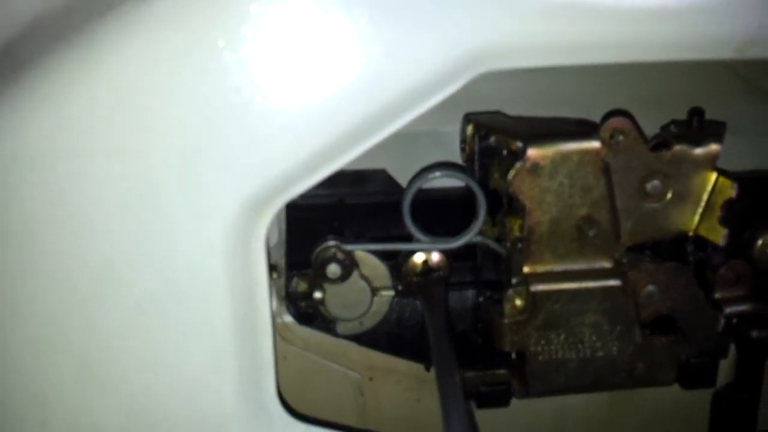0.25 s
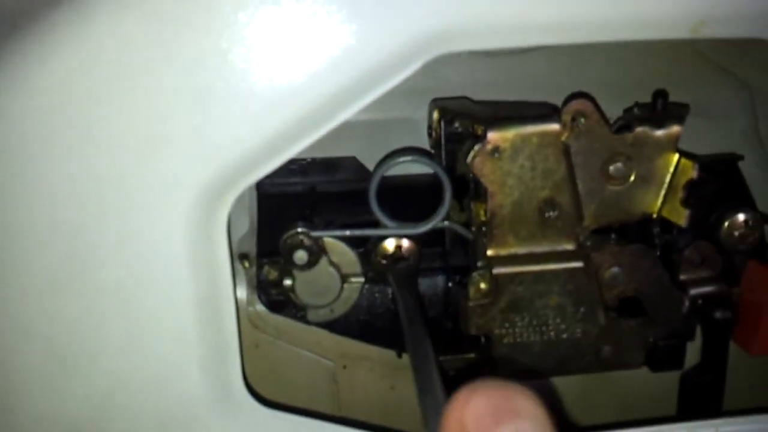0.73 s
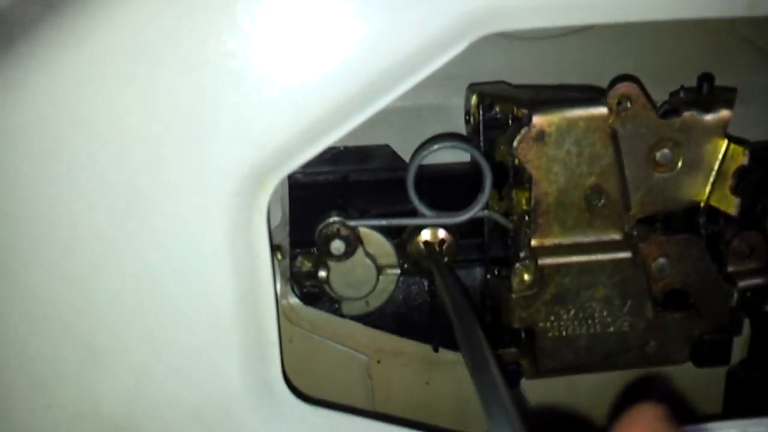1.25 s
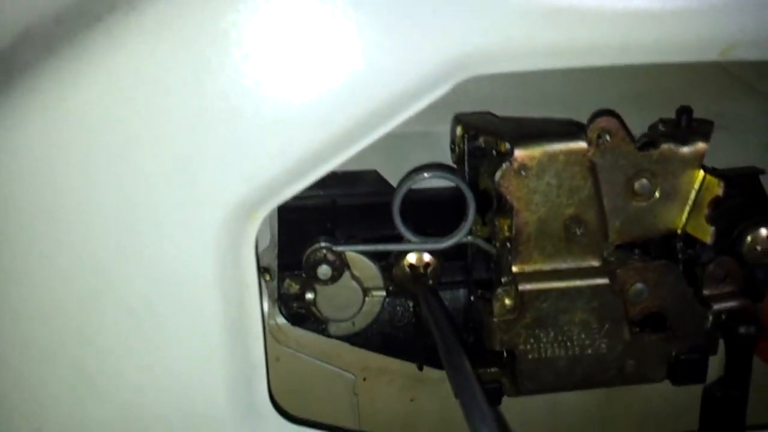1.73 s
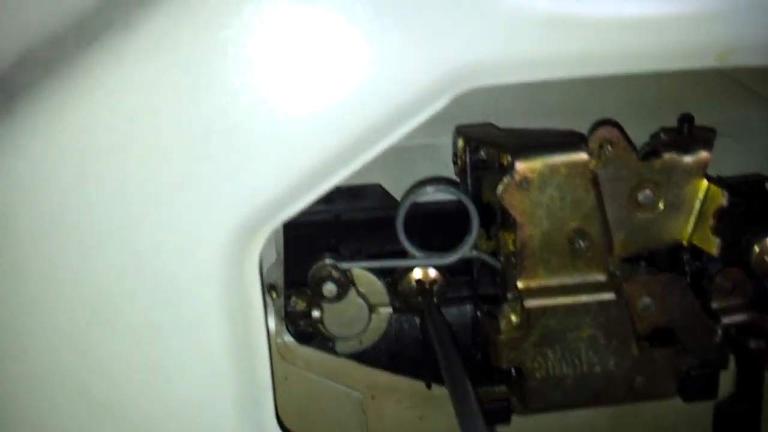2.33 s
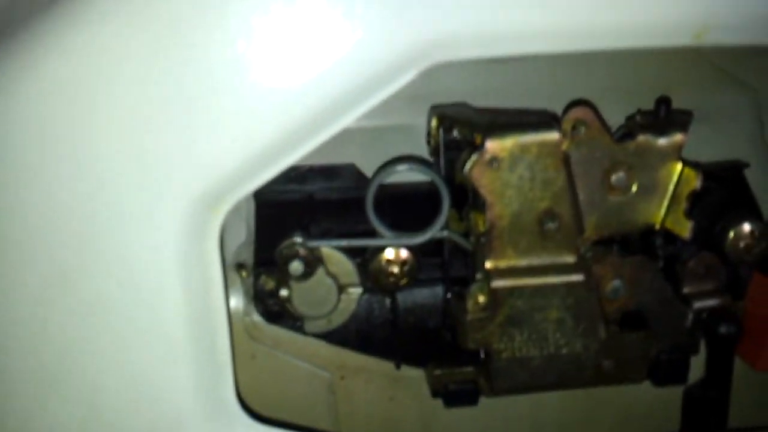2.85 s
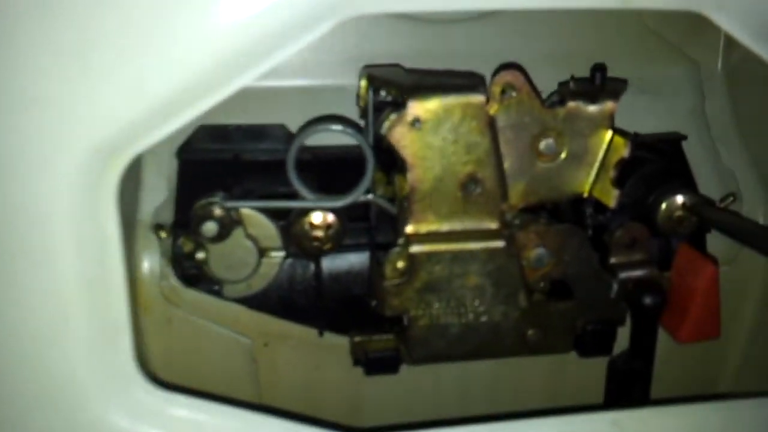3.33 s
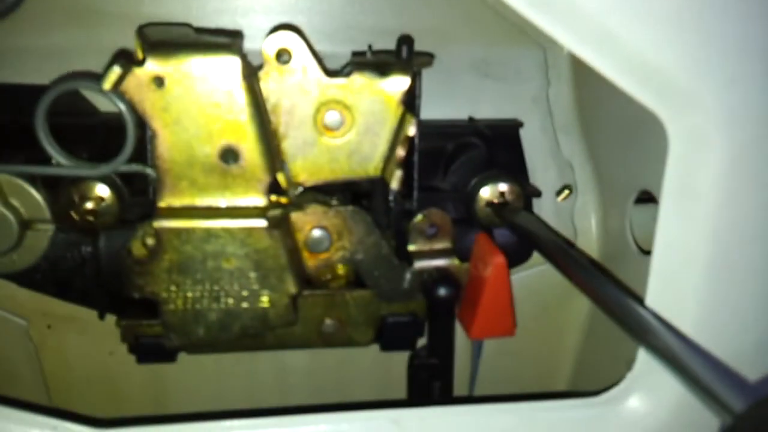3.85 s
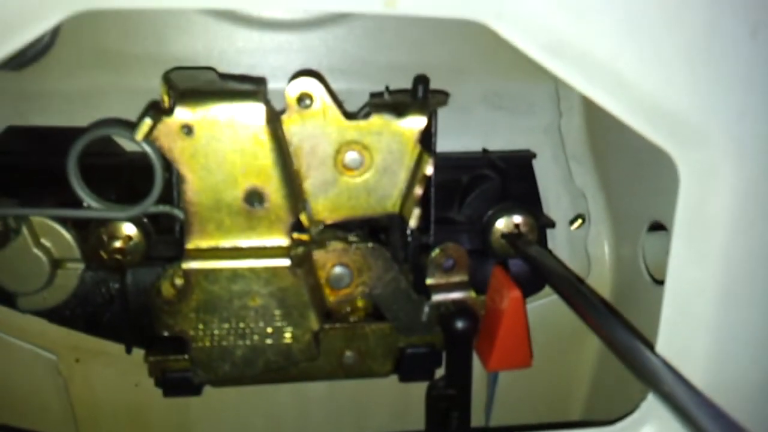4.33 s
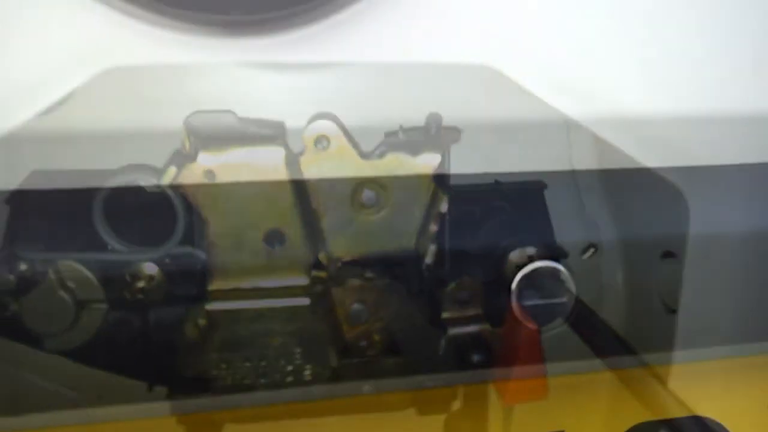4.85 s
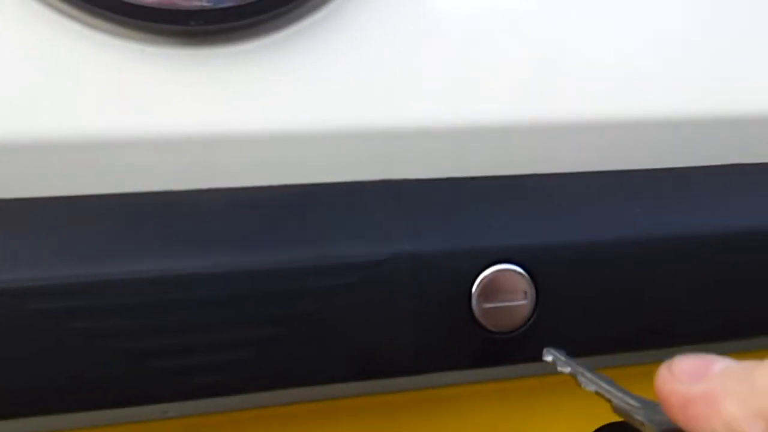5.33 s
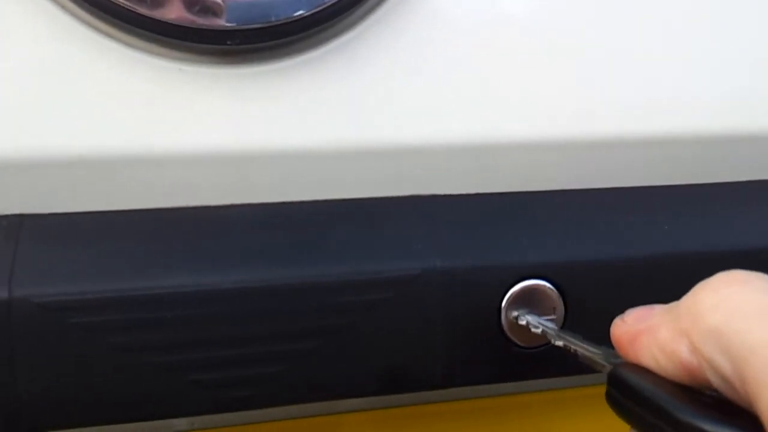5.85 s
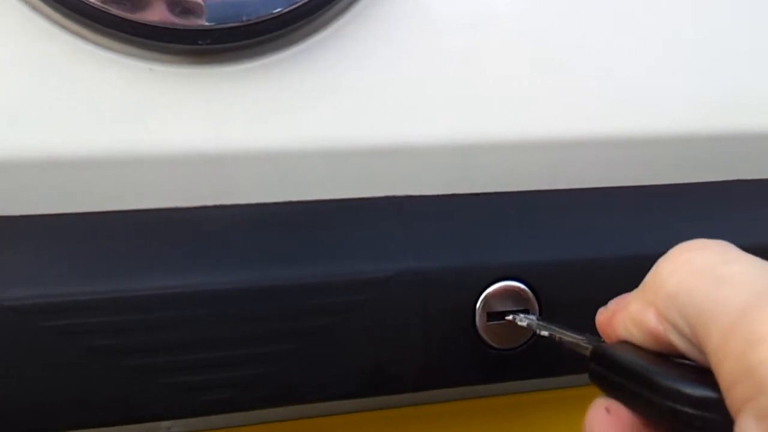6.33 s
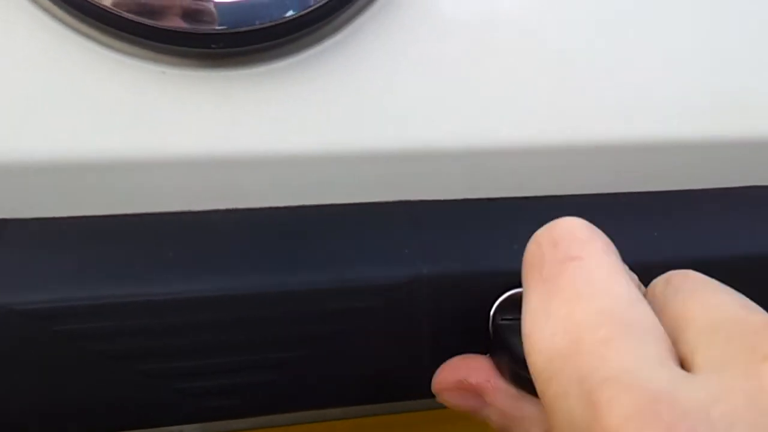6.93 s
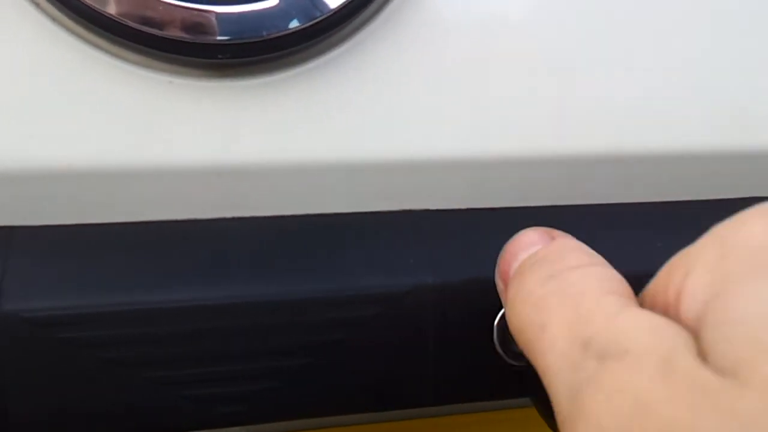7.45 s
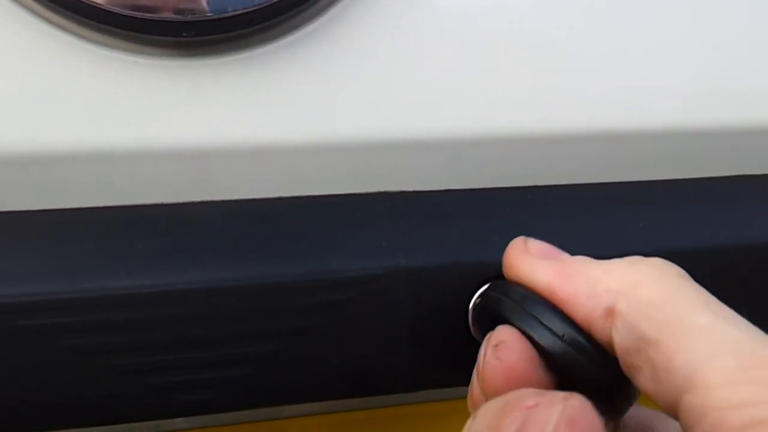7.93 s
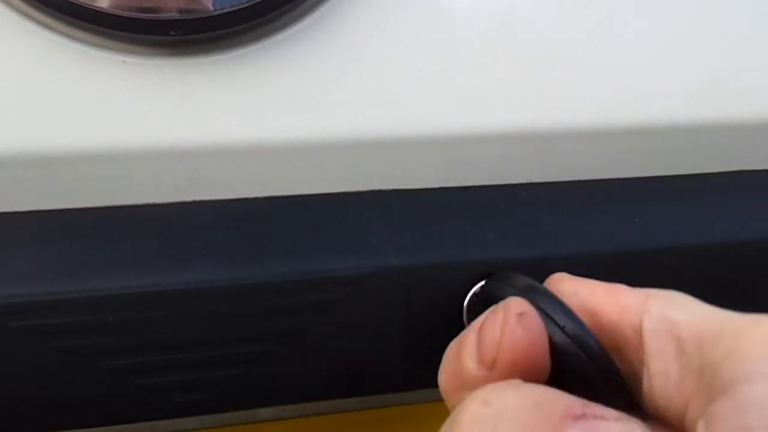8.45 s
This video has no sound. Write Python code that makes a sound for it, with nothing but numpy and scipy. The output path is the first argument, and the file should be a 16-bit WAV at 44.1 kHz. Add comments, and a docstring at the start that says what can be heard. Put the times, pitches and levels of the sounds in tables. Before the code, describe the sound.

A stereo microphone sits close to a hollow car door over a faint, low workshop drone. A screwdriver slips on latch screws, each slip giving a metallic clank and a short boom from the steel shell, clearest at about 0.3 and 1.9 seconds. A spring pings softly at 1.4, and the tip scrapes near 3. The loudest clank lands at 3.8, followed by a quick cluster around 4.3.

By about 5 seconds the drone has faded into quiet open air. A small bird gives thin, falling trills at 5.6 and, more faintly, 6.4. On the right, a key taps the lock from 6.2 and rasps in with a run of clicks around 7.1. It turns back and forth, clacking against its stops at 7.6 and 8, then more lightly until 8.6. The bird whistles faintly after 8, and light air puffs touch the microphone near 6.5 and 8.

```python
"""Workshop, stereo microphone close to a hollow car door, over a low drone. A screwdriver cracks loose
the latch screws: at every slip the bracket clanks and the steel shell booms; a spring pings once.
The drone gives way to open air and a small bird calls nearby. To the right, a key taps the lock,
rasps in over the wafers and is turned back and forth against its stops, while the bird calls again
and light air puffs on the microphone ports."""
import sys
import numpy as np
from scipy import signal
from scipy.fft import rfft, irfft, next_fast_len
from scipy.io import wavfile
from scipy.ndimage import map_coordinates

SR = 44100
rng = np.random.default_rng(int(sys.argv[2]) if len(sys.argv) > 2 else 0)


def generate_wav(signal):
    """Clip the signal to [-1, 1] and save it as 16-bit WAV at the path in sys.argv[1]."""
    frames = np.transpose(np.atleast_2d(signal))
    scaled = np.clip(frames, -1, 1) * 32767
    pcm = np.round(scaled).astype(np.int16)
    wavfile.write(sys.argv[1], SR, pcm)


N = 382788
TIME = np.arange(N) / SR
AGE = TIME[:SR // 2]  # time since a blow
PLAY_S = .0103  # time to cross the play between barrel and linkage

# door shell modes: (frequency [Hz], level struck at the left screw [dB], at the right screw [dB])
SHELL_MODES = [(143.5, -16.5, -20), (219.3, -11.5, -13), (251.2, -11.5, -10), (344.5, -21.5, -0.5),
               (404.6, 4, -0.5), (454.4, -7, -7.5), (532, -1, -3), (582, -6.5, -2.5), (641, 1.5, -1),
               (664, 1.5, -2), (725, -2, 2.5), (782, -9.5, -5.5), (863, -16, -2.5)]
# latch bracket modes: (frequency [Hz], level struck at the left screw [dB], at the right screw [dB])
BRACKET_MODES = [(908, -12, -9), (1031, 0, -4.5), (1148, -11, 0), (1196, -8.5, -5), (1245, 13, -11),
                 (1320, -17, -6.5), (1360, -5, -5), (1462, -14, 2.5), (1575, 2, -13), (1810, -0.5, -18),
                 (1960, -13, -21), (2017, 1, -6), (2340, -38, 1), (2606, -9, -4.5), (2770, -7, -5)]
# spectrum of the thin hiss and of the bird's echoes: (frequency [Hz], level [dB])
HISS_SPECTRUM = [(500, -23), (1800, 0), (3000, 2), (5500, -2.5), (8000, -1), (11000, -2), (15000, -4.5)]
# the barrel meets a stop twice over:
# (time [s], barrel clack [dB], door knock [dB], key click [dB], second hit over first [dB])
BARREL_STOPS = [(7.5655, -33, -42.5, -33, 6.5), (8.007, -40.5, -42, -31, -4.5), (8.215, -54, -67, -46.5, 1),
                (8.519, -50.5, -60.5, -34.5, -3), (8.638, -49.5, -50, -45, -1)]


def amp(db):
    """Decibels to gain."""
    return 10 ** (np.asarray(db) / 20)


def unit(x):
    """Scale to rms 1."""
    return x / np.sqrt(np.mean(x ** 2) + 1e-20)


def along(points, hz):
    """Read (frequency [Hz], value) points on a log axis."""
    f, v = np.transpose(points)
    return np.interp(np.log(hz + 1), np.log(f), v)


def pan(right_db):
    """Channel gains with the right right_db above the left."""
    return unit(amp([[-right_db / 2], [right_db / 2]]))


def add(track, s, sound):
    """Mix a stereo sound in at s seconds."""
    start = max(round(s * SR), 0)
    part = track[:, start:start + sound.shape[1]]
    part += sound[:, :part.shape[1]]


def wander(rate):
    """A smooth random curve with rate knots a second."""
    return map_coordinates(rng.standard_normal(int(N * rate / SR) + 4), [TIME * rate])


def noise(spectrum, size):
    """Coloured stereo noise of rms 1, most alike at the two ports in the upper bass."""
    # likeness of left and right: (frequency [Hz], correlation [ratio])
    likeness = [(40, 0.069), (150, 0.71), (450, 0.53), (900, 0.25), (2000, 0.0057)]
    m = next_fast_len(size)
    hz = np.fft.rfftfreq(m, 1 / SR)
    width = np.arccos(np.clip(along(likeness, hz), -1, 1)) / 2
    coloured = rfft(rng.standard_normal((2, m))) * amp(along(spectrum, hz))
    mid, side = irfft(coloured * [np.cos(width), np.sin(width)], m)[:, :size]
    return unit(np.array([mid + side, mid - side]))


def burst(spectrum, t60, attack):
    """Countless close resonances struck at once and dying together."""
    shape = amp(-60 * AGE / t60) * (1 - np.exp(-AGE / attack))
    return unit(noise(spectrum, len(AGE)) * shape) * np.sqrt(np.mean(shape ** 2))


def ring(modes, attack, scatter_db, spread, detune):
    """Modes struck at new strengths; spread is the phase scatter between the ports in radians."""
    hz, db, t60 = np.transpose(modes)[:, :, None]
    gain = amp(db + scatter_db * rng.standard_normal((2, len(hz), 1)))
    phase = rng.uniform(0, 2 * np.pi, hz.shape) + spread * rng.standard_normal(gain.shape)
    hz = hz * (1 + detune * rng.standard_normal(hz.shape))
    waves = np.exp((2j * np.pi * hz - np.log(1000) / t60) * AGE)
    weights = unit(gain) * np.exp(1j * phase) * np.sqrt(2 / len(hz))
    return (weights[..., 0] @ waves).real * (1 - np.exp(-AGE / attack))


def struck(modes, t60, slope, right_screw=True):
    """Modes for one striking place; t60 holds at 1 kHz, higher modes die sooner."""
    hz, left_db, right_db = np.transpose(modes)
    return np.transpose([hz, right_db if right_screw else left_db, t60 * (hz / 1000) ** -slope])


def strokes(rows, rise):
    """Moves that swell for the share rise, then fade: (time [s], gain curve, hiss over body [dB])."""
    moves = []
    for s, length, db, hiss_db in rows:
        angle = np.interp(np.linspace(0, 1, round(length * SR)), [0, rise, 1], [0, np.pi / 2, np.pi])
        moves.append((s, amp(db) * np.abs(np.sin(angle)) ** 1.88, hiss_db))
    return moves


def friction(moves, body, hiss, modes, chatter_db, grain_db, slip_hz, right_db):
    """Under each move, tiny slips make the level jump and set the metal chattering."""
    out = np.zeros((2, N))
    for start, gain, hiss_db in moves:
        t = TIME[:len(gain)]
        slips = np.interp(t * slip_hz, np.arange(4096), rng.standard_normal(4096))
        kicks = (rng.random(len(t)) < slip_hz / SR) * rng.standard_normal(len(t))
        metal = ring(modes, attack=.0001, scatter_db=-1.5, spread=1.65, detune=.005)
        chatter = unit(signal.fftconvolve(kicks[None], metal, axes=1)[:, :len(t)])
        low = unit(noise(body, len(t)) * amp(grain_db * slips / 2))
        grit = unit(noise(hiss, len(t)) * amp(grain_db * slips))
        high = unit(grit + amp(chatter_db) * chatter)
        add(out, start, gain * (low + amp(hiss_db) * high * pan(right_db)))
    return out


def background():
    """The workshop's low drone fades into open air, over a thin hiss."""
    # ambience at the microphone: (time [s], level [dB])
    ambience = [(0.0, -65), (0.9, -68.5), (1.91, -68), (2.0, -65.5), (3.64, -70), (4.45, -64), (4.89, -71),
                (6.2, -66.5)]
    # spectrum of the workshop drone: (frequency [Hz], level [dB])
    room_tone = [(15, -56), (25, -26), (66, -12), (102, -11.5), (144, 0.5), (182, -5.5), (204, -8),
                 (248, -8), (378, -14), (636, -14), (715, -17), (1270, -18), (2500, -25.5), (3250, -67),
                 (5500, -120)]
    # spectrum of the open air: (frequency [Hz], level [dB])
    air_tone = [(15, -50), (25, -36), (66, -0.5), (189, 1), (567, -12), (624, -10.5), (772, -7.5),
                (1070, -10.5), (1230, -15.5), (2500, -22.5), (3250, -56), (5500, -120)]
    level_db = np.interp(TIME, *np.transpose(ambience))
    outside = np.clip((TIME - 4.4) / 0.82, 0, 1)
    drone = amp(1) * np.sqrt(1 - outside) * noise(room_tone, N)
    open_air = amp(0.5) * np.sqrt(outside) * noise(air_tone, N)
    hiss = amp(-4 + .5 * wander(rate=10)) * noise(HISS_SPECTRUM, N)
    drift_db = wander(rate=7)
    return amp(level_db) * (amp(drift_db) * (drone + open_air) + hiss)


def puffs():
    """An eddy pushes and pulls on one microphone port for about one cycle."""
    # air puffs: (time [s], level [dB], port [-1 left, 1 right])
    eddies = [(6.469, -33.5, 1), (6.481, -29.5, 1), (8.025, -29.5, -1), (8.086, -28.5, -1),
              (8.293, -39, -1), (8.597, -40.5, -1)]
    eddy_hz, lead_s = 226, .02
    cycles = (AGE - lead_s) * eddy_hz
    pressure = np.sin(2 * np.pi * cycles) * np.exp(-(cycles / 0.57) ** 2)
    out = np.zeros((2, N))
    for s, db, port in eddies:
        add(out, s - lead_s, amp(db) * pressure * pan(right_db=35 * port) / np.sqrt(2))
    return out


def bird_notes():
    """Trills slow and sink, a whistle swells: (time [s], length [s], pitch [Hz], slide [Hz], level [dB])"""
    # trills: (time [s], notes [count], first pitch [Hz], slide within a note [Hz], level [dB])
    trills = [(5.627, 4, 7910, 2700, -52.5), (6.407, 5, 7630, 1750, -65)]
    # the whistle's long and short note: (delay [s], length [s], pitch drop [Hz], slide [Hz], level [dB])
    whistle_pair = [(0, 0.095, 1, 330, -2), (0.085, 0.038, 99.5, 160, -7)]
    first_note_s, lengthen_s, gap_s, sag_hz = .047, .005, .042, 249
    rows = []
    for s, count, hz, slide_hz, db in trills:
        for k in range(round(count)):
            length = first_note_s + k * lengthen_s
            rows.append((s, length, hz - k * sag_hz, slide_hz, db))
            s = s + length + gap_s
    for k in range(3):  # each pair is lower and louder than the last
        s, hz, db = 8.054 + k * .14, 7240 - k * 60, -61.5 + k * 1.5
        for delay, length, drop_hz, slide_hz, note_db in whistle_pair:
            rows.append((s + delay, length, hz - drop_hz, slide_hz, db + note_db))
    return rows


def bird():
    """Off to the right, thin whistles slide down ever faster; nearby walls make them flutter and trail."""
    song = np.zeros((2, N))
    for s, length, start_hz, slide_hz, db in bird_notes():
        u = np.linspace(0, 1, round(length * SR))
        quaver_hz = .025 * slide_hz * map_coordinates(rng.standard_normal(20), [19 * u])
        hz = start_hz - slide_hz * u ** 1.7 + quaver_hz
        swell = np.abs(np.sin(np.pi * u ** 0.76)) ** 1.17
        tone = np.sin(2 * np.pi * np.cumsum(hz) / SR) * swell
        flutter_db = 3 * map_coordinates(rng.standard_normal(20), [19 * u])
        add(song, s, amp(db + flutter_db) * tone * pan(right_db=8))
    early = amp(-15.5) * burst(HISS_SPECTRUM, t60=0.029, attack=0.00083)
    late = amp(-32) * burst(HISS_SPECTRUM, t60=0.25, attack=0.005)
    return song + signal.fftconvolve(song, early + late, axes=1)[:, :N]


def spring():
    """The wire return spring shifts on its seat with one soft ping."""
    # spring modes: (frequency [Hz], level [dB], t60 [s])
    wire_modes = [(1130, 1, 0.014), (3050, -12, .026), (3500, -9, 0.012), (3820, -6, .012)]
    out = np.zeros((2, N))
    ping = ring(wire_modes, attack=.0025, scatter_db=1.5, spread=0.58, detune=.004)
    add(out, s=1.428, sound=amp(-40) * ping)
    return out


def detent():
    """The sprung detent snaps in and rebounds, equally hard at every stop of the barrel."""
    # detent modes: (frequency [Hz], level [dB], t60 [s])
    detent_modes = [(2145, 2.5, 0.021), (2590, -5.5, 0.025), (3090, -2, 0.017), (3760, 2, 0.015)]
    out = np.zeros((2, N))
    for s, *_ in BARREL_STOPS:
        for delay, db in [(0, -42), (PLAY_S, -45)]:
            snap = ring(detent_modes, attack=0.00025, scatter_db=2.5, spread=1.05, detune=.025)
            add(out, s + delay, amp(db) * snap * pan(right_db=3.5))
    return out


def bounces(length, count):
    """The loose key blade grazes and bounces: a brief swarm of tiny impacts."""
    u = rng.random(count)
    sizes = rng.standard_normal(count) * np.sin(np.pi * u)
    return np.bincount((u * length * SR).astype(int), sizes / np.linalg.norm(sizes))


def lock_hits():
    """One hit a touch of the key, two a stop: (time [s], knock [dB], clack [dB], click [dB])."""
    # the key touches the lock and catches on wafers: (time [s], door knock [dB], click over knock [dB])
    contacts = [(6.2389, -48.5, 17.5), (6.393, -53.5, 13), (6.412, -51.5, 19.5), (6.548, -68.5, 16.5),
                (6.646, -56, 7), (6.818, -53, 5.5), (6.917, -51, 2), (6.938, -57, 8.5), (6.956, -57.5, 13),
                (6.977, -53, 14.5), (7.02, -43, 10.5), (7.052, -40.5, -6), (7.089, -40.5, 11),
                (7.102, -32, 7.5), (7.124, -42.5, 15.5), (7.16, -54.5, 18.5), (7.223, -55, 4),
                (7.491, -50.5, -27), (7.723, -55, -3), (7.861, -54, 4.5), (7.8836, -44, -5.5),
                (8.455, -58.5, -12), (8.622, -56.5, 6.5)]
    barrel_db, barrel_per_hardness = 2.5, 0.087  # the clack over the knock grows with hardness
    hits = [(s, db, db + barrel_db + barrel_per_hardness * hard_db, db + hard_db)
            for s, db, hard_db in contacts]
    for s, clack_db, knock_db, click_db, second_db in BARREL_STOPS:
        for delay, db in [(0, 0), (PLAY_S, second_db)]:
            hits.append((s + delay, knock_db + db, clack_db + db, click_db + db))
    return hits


def key():
    """Close on the right, the key rasps; each hit rings it, clacks the barrel and knocks the door skin."""
    # modes of key and wafers: (frequency [Hz], level [dB], t60 [s])
    key_modes = [(3440, -10.5, 0.03), (3960, 2.5, 0.01), (5030, -8, 0.0063), (6760, 11.5, 0.011),
                 (7000, -12, 0.0044), (8020, 8.5, 0.012), (8650, 8, 0.015), (8650, -6.5, 0.011),
                 (14000, -9, .009)]
    # dense resonances of the door skin: (frequency [Hz], level [dB])
    skin_spectrum = [(30, -35), (90, -11), (160, 4), (290, -15), (390, 7), (560, -6.5), (780, 4.5),
                     (1100, -16), (2500, -27)]
    # dense resonances of the barrel: (frequency [Hz], level [dB])
    barrel_spectrum = [(300, -46), (750, -12), (1100, 4), (1450, 0.5), (2100, 1.5), (2650, -16),
                       (6000, -32.5)]
    # bright rasp of key on wafers: (frequency [Hz], level [dB])
    rasp_spectrum = [(1200, -58), (2850, -17), (3800, 5), (5200, -2), (7000, 1), (9100, 2.5), (10500, -6.5),
                     (14500, -9)]
    # low body of the rubbing: (frequency [Hz], level [dB])
    rub_spectrum = [(60, -21.5), (150, 9.5), (290, -1.5), (400, 4), (750, 1.5), (1400, -6.5), (2200, -10),
                    (3200, -27), (7000, -41)]
    # the key is pushed home: (time [s], level [dB])
    push_levels = [(6.97, -61), (6.978, -50), (6.998, -53.5), (7.016, -41), (7.066, -45.5), (7.1, -34),
                   (7.158, -45), (7.19, -84)]
    # the key shifts in its slot: (time [s], length [s], body [dB], hiss over body [dB])
    slides = [(6.36, 0.21, -56.5, -6), (6.52, 0.3, -61.5, -2.5), (6.778, 0.12, -59.5, -7.5),
              (7.17, 0.15, -55, -5), (7.546, 0.045, -45.5, -2), (7.58, 0.14, -49, -20),
              (7.868, 0.13, -57, -7.5), (8.45, 0.081, -57, -10)]
    shell = struck(SHELL_MODES, t60=0.18, slope=0.75)
    bracket = struck(BRACKET_MODES, t60=0.11, slope=0.22)
    grip = .045  # fingers and wafers shift the key's modes from touch to touch
    out = np.zeros((2, N))
    for s, knock_db, clack_db, click_db in lock_hits():
        knock = amp(1) * burst(skin_spectrum, t60=0.16, attack=0.0012)
        knock += amp(-6) * ring(shell, attack=0.0019, scatter_db=3.5, spread=0.61, detune=0.0211)
        clack = amp(4.5) * burst(barrel_spectrum, t60=0.023, attack=0.0004)
        clack += amp(-11) * ring(bracket, attack=0.0026, scatter_db=7.5, spread=1.15, detune=0.019)
        click = amp(3) * ring(key_modes, attack=0.00078, scatter_db=2.5, spread=1.88, detune=grip)
        click += amp(2.5) * burst(rasp_spectrum, t60=0.0099, attack=0.00013)
        click += amp(-23.5) * burst(rasp_spectrum, t60=0.11, attack=.001)
        click *= amp(click_db) * pan(right_db=13.5)
        add(out, s, amp(knock_db) * knock + amp(clack_db) * clack * pan(right_db=2.5) + click)
        grazes = signal.fftconvolve(click, bounces(length=.012, count=14)[None], axes=1)
        add(out, s - .003, amp(-7.5) * grazes)
    times, push_db = np.transpose(push_levels)
    push_gain = amp(np.interp(np.arange(times[0], times[-1], 1 / SR), times, push_db) - 0.5)
    push_hiss_db = 1.3
    moves = [(times[0], push_gain, push_hiss_db)] + strokes(slides, rise=0.18)
    return out + friction(moves, rub_spectrum, rasp_spectrum, key_modes,
                          chatter_db=-10, grain_db=4.5, slip_hz=903, right_db=11)


def screwdriver():
    """Close up, the tip scrapes and snaps, the bracket clanks, and the boom builds up inside the door."""
    # slips of the tip; a hard one clicks more and booms less: (time [s], clank [dB], hardness [dB])
    blows = [(0.032, -51.5, 4.5), (0.3482, -34, -6.5), (1.202, -66, -7), (1.499, -56, 11),
             (1.8697, -38, -4.5), (2.14, -51, -11), (2.22, -50.5, 4), (2.908, -62, -3.5),
             (3.796, -26.5, 5.5), (4.174, -43.5, -1), (4.285, -33, 11), (4.3393, -38, 9.5),
             (4.526, -57, -13.5), (4.719, -54, -3)]
    # the tip rubs in the screw head: (time [s], length [s], body [dB], hiss over body [dB])
    scrapes = [(.075, 0.12, -62, -0.5), (2.82, 0.35, -68, -2), (2.934, 0.068, -49.5, 0),
               (3.14, 0.4, -83.5, 12.5), (4.148, 0.071, -46, -24)]
    # dense resonances of the door shell: (frequency [Hz], level [dB])
    boom_spectrum = [(30, -63), (95, -40), (140, -4), (240, -17), (305, -10.5), (390, 3), (680, -3.5),
                     (950, -10), (1500, -54), (4000, -44)]
    # the workshop's reverberation: (frequency [Hz], level [dB])
    room_spectrum = [(40, -23), (140, -2), (300, 8), (650, -9.5), (1500, -13), (5000, -21.5)]
    # dense resonances of the bracket: (frequency [Hz], level [dB])
    clank_spectrum = [(300, -57), (750, -5), (1150, 3), (1600, -1.5), (1900, -4.5), (2500, -14.5),
                      (3200, -21.5), (7000, -51)]
    # click and hiss of the tip: (frequency [Hz], level [dB])
    tip_spectrum = [(1000, -20), (2600, 1), (4000, 2.5), (6000, -2.5), (8500, -4), (10500, -20.5),
                    (15000, -22)]
    # body of the scraping in the screw head: (frequency [Hz], level [dB])
    screw_spectrum = [(100, -16), (400, 2.5), (900, 3.5), (1600, 2.5), (2500, -4.5), (6000, -59)]
    out = np.zeros((2, N))
    for s, db, hard_db in blows:
        right_screw = s > 3  # the left screw comes first
        shell = struck(SHELL_MODES, t60=0.23, slope=0.42, right_screw=right_screw)
        bracket = struck(BRACKET_MODES, t60=0.24, slope=0.99, right_screw=right_screw)
        boom = amp(-1) * ring(shell, attack=0.0039, scatter_db=1.5, spread=0.63, detune=0.0084)
        clank = amp(-4.5) * ring(bracket, attack=0.00018, scatter_db=4, spread=1.52, detune=0.0023)
        boom += amp(-2.5) * burst(boom_spectrum, t60=0.35, attack=0.002)
        boom += amp(-21.5) * burst(room_spectrum, t60=0.78, attack=0.033)
        clank += amp(-3) * burst(clank_spectrum, t60=0.18, attack=0.00015)
        click = amp(6.5) * burst(tip_spectrum, t60=0.0074, attack=.0001)
        click += amp(-5) * burst(tip_spectrum, t60=0.082, attack=0.0012)
        click *= amp(hard_db - 8) * pan(right_db=4.5)
        add(out, s, amp(db) * (amp(-hard_db) * boom + clank + click))
    damped_bracket = struck(BRACKET_MODES, t60=0.15, slope=.7)  # under the pressed tip
    return out + friction(strokes(scrapes, rise=0.31), screw_spectrum, tip_spectrum, damped_bracket,
                          chatter_db=-4, grain_db=2.5, slip_hz=573, right_db=2.5)


def scene():
    """Latch, lock and surroundings as they reach the microphone."""
    return screwdriver() + spring() + key() + detent() + bird() + puffs() + background()


def record(dry):
    """The recorder keeps nothing above its band limit."""
    top_hz = 14750
    m = next_fast_len(N + SR // 2)
    passband = np.fft.rfftfreq(m, 1 / SR) < top_hz
    return irfft(rfft(dry, m) * passband, m)[:, :N]


dry = scene()
out = record(dry)
generate_wav(out)
```